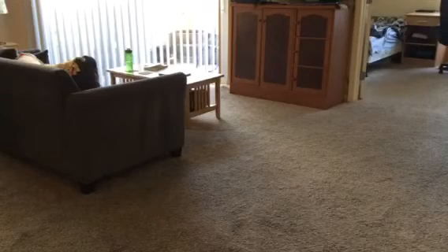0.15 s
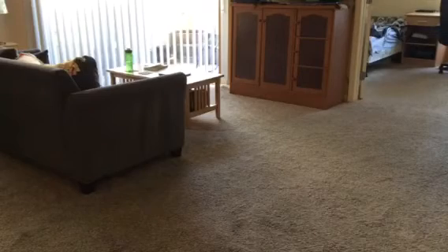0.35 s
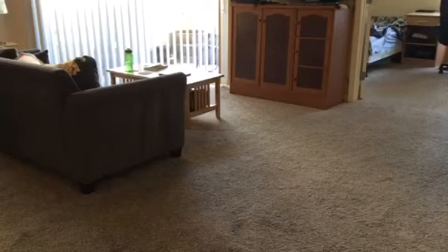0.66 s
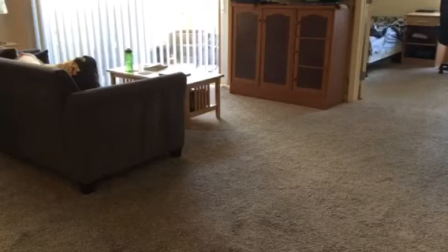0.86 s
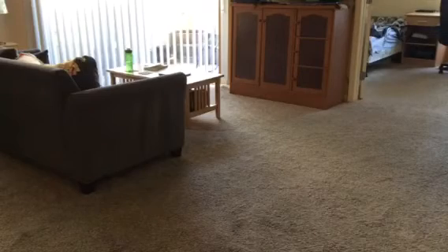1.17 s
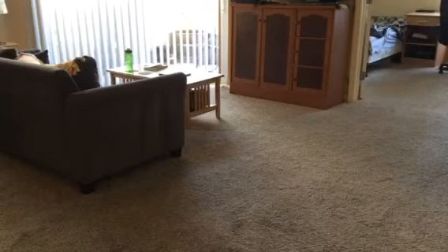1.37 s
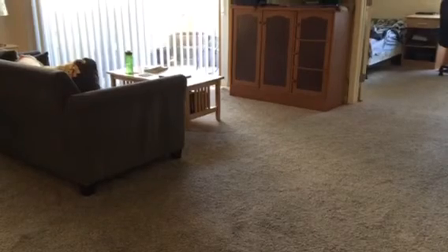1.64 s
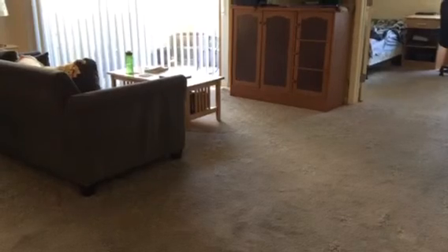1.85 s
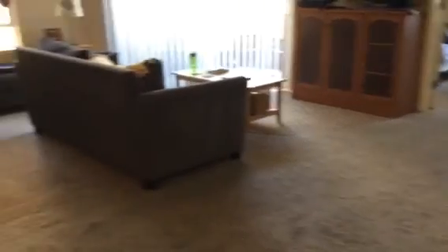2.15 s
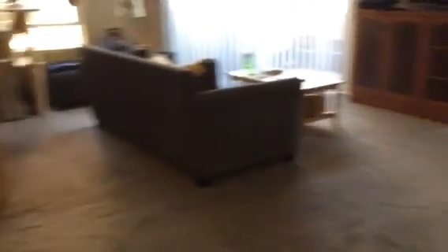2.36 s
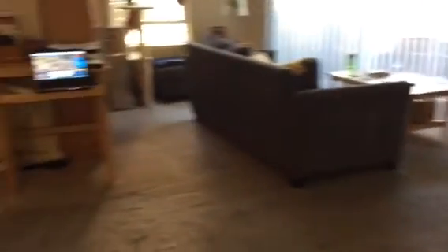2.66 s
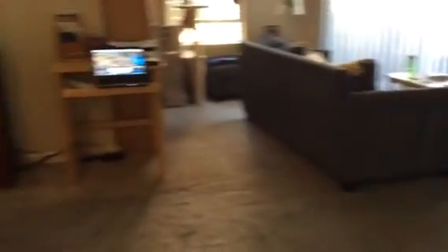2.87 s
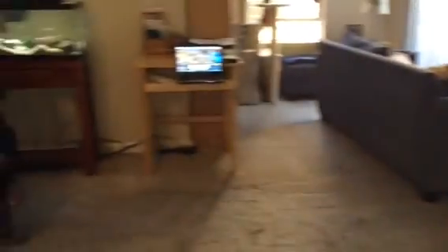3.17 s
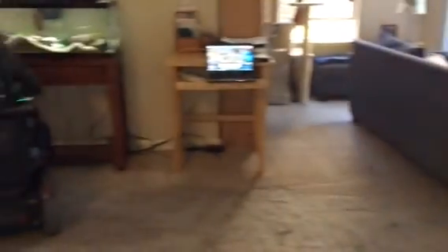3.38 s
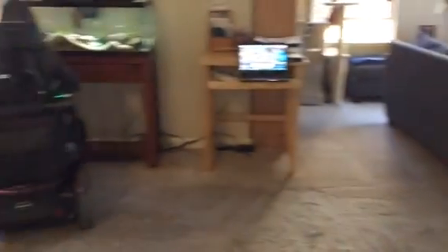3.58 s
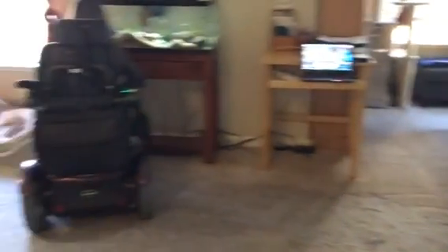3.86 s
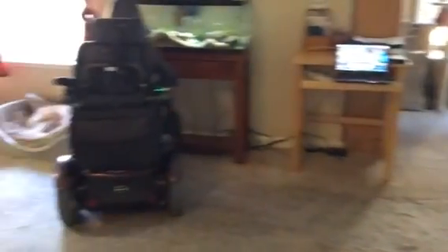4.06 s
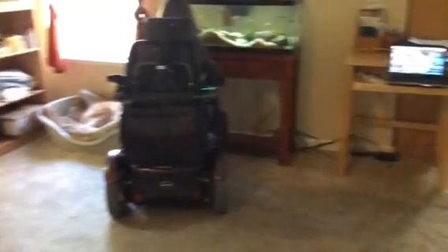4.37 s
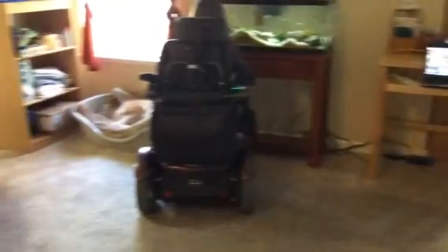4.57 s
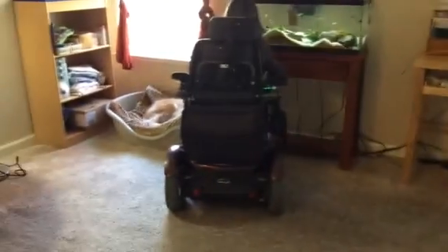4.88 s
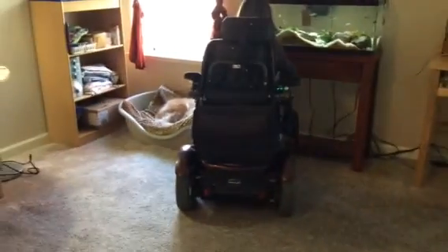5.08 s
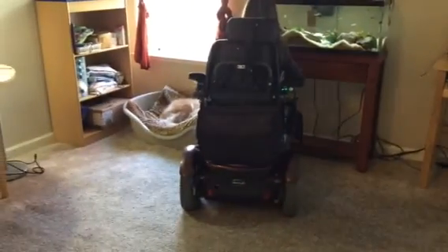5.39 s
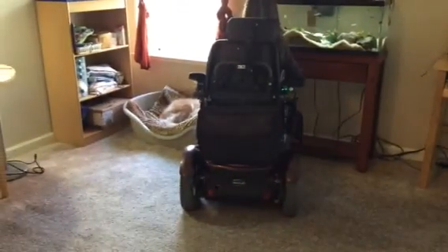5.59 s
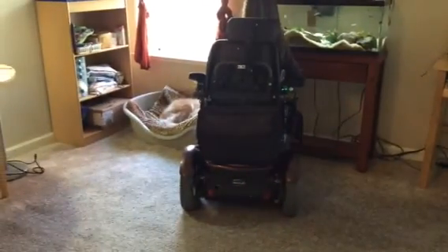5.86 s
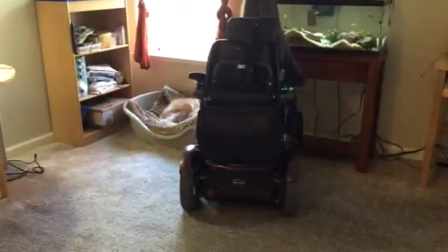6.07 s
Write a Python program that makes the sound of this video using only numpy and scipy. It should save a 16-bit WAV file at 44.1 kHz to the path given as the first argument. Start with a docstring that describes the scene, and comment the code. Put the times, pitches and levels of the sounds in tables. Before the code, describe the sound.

A quiet carpeted living room with a faint pump hum that grows louder. After about a second and a half, a power wheelchair a couple of metres from a phone snaps its brakes off in sharp clicks, jerks with a clunk and gear grind, then drives on with whirring motors, rattling frame and hissing tyres. It recedes, stops with a dull clack, and soft bumps follow over the aquarium.

```python
"""A carpeted living room, heard from a phone: an aquarium pump hums, louder once the phone swings round to it.
A power wheelchair a couple of metres away clicks its brakes off in short rings of their plates; a first nudge
takes up the load with a clunk of frame modes and grinding gear teeth, and the frame rattles through a turn.
Noise rung in the motor housings whirs, the tyres hiss on the pile, and the chair rolls away over the carpet.
The motors stop, a brake drops shut with a clack, and soft bumps follow over the pump, water and still air."""
import sys
import numpy as np
from scipy import signal
from scipy.fft import rfft, irfft, next_fast_len
from scipy.io import wavfile
from scipy.ndimage import uniform_filter1d, map_coordinates

SR = 44100
rng = np.random.default_rng(int(sys.argv[2]) if len(sys.argv) > 2 else 0)


def transcribe(u):
    """Save the signal u as a 16-bit wav file named by the first command-line argument.

    u: samples, shape (n,) or (channels, n), limited to [-1, 1]; the rate is SR.
    q: integer samples, one column per channel.
    """
    v = np.clip(np.atleast_2d(u).T, -1, 1)
    q = np.round(v * 32767).astype(np.int16)
    wavfile.write(sys.argv[1], SR, q)


N = 274743
TIME = np.arange(N) / SR


def undb(db):
    """Decibels to gain."""
    return 10 ** (np.asarray(db) / 20)


def unit(x):
    """Scale to rms 1."""
    return x / np.sqrt(np.mean(x ** 2))


def noise(length=N):
    """White noise."""
    return rng.standard_normal(length)


def colour(x, points):
    """Filter by a smooth (Hz, dB) spectrum; rms 1."""
    hz, db = np.transpose(points)
    size = next_fast_len(len(x))
    bins = np.maximum(np.fft.rfftfreq(size, 1 / SR), 1)
    gain = undb(np.interp(np.log(bins), np.log(hz), db))
    return unit(irfft(rfft(x, size) * gain, size)[:len(x)])


def resonate(x, hz, width):
    """One resonance, gain 1 at its centre."""
    return signal.lfilter(*signal.iirpeak(hz, hz / width, fs=SR), x)


def housing(x, modes):
    """Ring a set of (Hz, width Hz, dB) resonances with alternating signs; rms 1."""
    rung = 0
    for k, (hz, width, db) in enumerate(modes):
        rung = rung + (-1) ** k * undb(db) * resonate(x, hz, width)
    return unit(rung)


def walk(rate):
    """Random levels held 1 / rate s and slewed; spread near 1."""
    hold = int(SR / rate)
    steps = np.repeat(noise(N // hold + 1), hold)
    return unit(uniform_filter1d(steps, hold)[:N])


def grains(per_s, spread_db):
    """Dense tiny impacts of very unequal size; rms 1."""
    hit = rng.random(N) < per_s / SR
    size_db = spread_db * np.minimum(rng.exponential(size=N), 4)
    return unit(hit * noise() * undb(size_db))


def fade(t, t60):
    """Free decay of a struck thing, 60 dB in t60 seconds."""
    return np.exp(-np.log(1000) * t / t60)


def ramp(start, length):
    """Rise evenly from 0 to 1."""
    return np.clip((TIME - start) / length, 0, 1)


def add(out, s, sound):
    """Mix a short sound in at s seconds."""
    i = int(s * SR)
    out[i:i + len(sound)] += sound[:N - i]


# Resonances of the motor and gear housings. Each row: centre in Hz, width in Hz, relative level in dB.
HOUSING_MODES = [(826, 27, -2.5), (968, 67, -16), (1150, 87, -5.5), (1508, 84, 0.5), (1766, 93, -0.5),
                 (1997, 130, 0.5), (2177, 83, 2), (2600, 110, -5), (2890, 140, -6), (3504, 380, -8),
                 (4540, 380, -14), (5000, 170, -13), (6540, 180, -10.5)]
# Hiss of the tyres on the pile. Each row: frequency in Hz, relative density in dB per Hz.
TYRE_SPECTRUM = [(700, -35), (1500, -7), (2100, 0), (2400, -6), (2900, 3.5), (3700, -1.5), (4750, -2.5),
                 (5100, -1), (5500, -2.5), (6100, 2), (6500, 5), (6950, -3), (7500, -2), (8100, 0.5),
                 (8600, -4.5), (9500, -1), (10000, -8), (12500, -11.5), (15500, -17.5)]
# Low resonances of the chassis under load. Each row: centre in Hz, width in Hz, relative level in dB.
CHASSIS_MODES = [(243.7, 32, 3), (322, 33, 1), (380, 15, -1), (426, 30, 1.5), (520, 59, -3.5),
                 (683, 23, -5), (800, 56, -6), (1064, 140, -6)]
# Rumble of the wheels on the floor. Each row: frequency in Hz, relative density in dB per Hz.
FLOOR_SPECTRUM = [(20, -34.5), (40, -15), (58, 0), (70, 4), (88, 0), (103, -0.5), (140, -5.5), (165, -10.5),
                  (200, -17), (260, -16.5), (340, -30.5), (600, -55), (16000, -93.5)]


def drive(shaft_hz=59.8, brush_depth=0.13, flutter_db=1.77, overtone_db=-20, unbalance_db=-18):
    """Brushes and gear teeth scrape in the housings; tyres crush the carpet pile and shake the floor."""
    halt_s, halt_fade_s = 5.02, 0.06
    cruise_s, cruise_rise_s, cruise_db = 3.29, 0.28, -51
    hiss_flicker_db, pile_db = 0.8, 1.7
    whir, hiss, growl, rumble = drive_levels()
    moving = 1 - ramp(halt_s - halt_fade_s, halt_fade_s)
    # the uneven pile makes the motors' speed and load waver
    turn = 2 * np.pi * np.cumsum(shaft_hz * (1 + 0.003 * walk(12))) / SR
    load = undb(walk(14))
    # the friction swells twice in each turn of the armature
    scrape = (noise() + 0.71 * grains(700, 1.4)) * (1 + brush_depth * np.cos(2 * turn))
    gears = housing(scrape, HOUSING_MODES) * whir * undb(flutter_db * walk(25.25))
    crush = noise() + 0.68 * grains(2500, 1.7)
    pile = colour(crush, TYRE_SPECTRUM) * hiss * undb(hiss_flicker_db * walk(27))
    tooth_spectrum = [(100, -10.0), (220, 0.5), (380, 2.0), (1100, -0.5), (2500, -24.5), (16000, -53)]
    teeth = colour(grains(1200, 1.0), tooth_spectrum)
    chassis = housing(teeth, CHASSIS_MODES) * growl
    floor = colour(noise(), FLOOR_SPECTRUM) * rumble
    # the motors hum once they reach cruising speed
    tones = undb(unbalance_db) * np.sin(turn) + np.sin(2 * turn) + undb(overtone_db) * np.sin(4 * turn)
    hum = unit(tones) * load * undb(cruise_db) * ramp(cruise_s, cruise_rise_s)
    return moving * (gears + pile + (chassis + floor) * undb(pile_db * walk(9)) + hum)


# Pushes of the joystick: taking up the load, a nudge, the long run, and a turn on top of it.
# Each row: start in seconds, speed-up in seconds, let go in seconds, slow-down in seconds, then the
# full-speed levels of gear whir, tyre hiss, motor growl and wheel rumble in dB, before the chair leaves.
JOYSTICK_PUSHES = [(1.638, 0.023, 1.84, 0.11, -64, -84.5, -56, -51.5),
                   (1.87, 0.18, 2.088, 0.15, -58, -57.5, -55.5, -52),
                   (2.17, 0.29, 4.82, 0.2, -56.5, -60, -62, -53.5),
                   (2.8, 0.28, 3.2, 0.16, -56.5, -57, -57, -49.5)]


def drive_levels():
    """Gains of whir, hiss, growl and rumble: pushes ramp the speed up and down, distance thins the sound."""
    # the distance is relative: only its growth against the starting value counts
    start_distance, leaves_s, growth_per_s = 0.69, 3.89, 1.55
    # powers of speed and of distance, in the order whir, hiss, growl, rumble; the lows fill the room
    speed_powers = np.array([0.55, 1, 0.99, 0.77])[:, None]
    distance_powers = np.array([0.7, 1.26, 0.39, 0.63])[:, None]
    energy = 0
    for start, rise, let_go, fall, *db in JOYSTICK_PUSHES:
        speed = ramp(start, rise) * (1 - ramp(let_go, fall))
        energy = energy + (undb(db)[:, None] * speed ** speed_powers) ** 2
    distance = start_distance + growth_per_s * np.maximum(TIME - leaves_s, 0)
    return np.sqrt(energy) * (start_distance / distance) ** distance_powers


# The gears' song under load. Each row: centre in Hz, width of one filter pass in Hz, relative level in dB.
SONG_MODES = [(377, 22, 9), (467, 46, 2), (1017, 110, -7), (1510, 98, -2.5), (2190, 180, -5.5)]
# Broad grinding of the loaded teeth. Each row: frequency in Hz, relative density in dB per Hz.
GRIND_SPECTRUM = [(70, -5), (130, 9), (190, 4), (330, 6.5), (480, 4), (560, 5.5), (680, 0.5), (1080, -0.5),
                  (1280, -15), (1520, -2), (1850, -9), (2200, 2), (2500, -8), (3400, -7.5), (3900, -19),
                  (7000, -30), (16000, -48)]
# Swells of gear load as the chair gets under way. Each row: start in seconds, rise in seconds,
# end in seconds, fall in seconds, level in dB, brightness of the song in dB per octave,
# grinding relative to that level in dB.
GEAR_LOADS = [(1.875, 0.096, 2.057, 0.11, -43, 0, -0.5), (2.37, 0.076, 2.45, 0.039, -46, -10, -14)]


def strain():
    """Loaded gear teeth grind roughly and ring wavering resonances; a light load leaves mostly a low groan."""
    song_db, song_waver = -5, 0.015  # the waver is a share of the pitch
    judder_db, judder_per_s = 2.2, 90  # the teeth catch and slip
    teeth, out = grains(2500, 1), 0
    uneven = np.cumsum(1 + song_waver * walk(20))
    song = []
    for hz, width, db in SONG_MODES:
        once = resonate(teeth, hz, width)
        song.append(undb(db) * resonate(once, hz, width))
    song = np.array(song)
    octaves = np.log2(np.array(SONG_MODES)[:, 0] / SONG_MODES[0][0])
    judder = unit(undb(judder_db * walk(judder_per_s)))
    grind = colour(noise() + grains(900, 2), GRIND_SPECTRUM) * judder
    for start, rise, end, fall, db, tilt_db, grind_db in GEAR_LOADS:
        steady = undb(tilt_db * octaves) @ song
        # reading at an uneven pace bends the pitch
        sung = unit(map_coordinates(steady, [uneven], order=1, mode="mirror"))
        swell = undb(db) * ramp(start, rise) * (1 - ramp(end, fall))
        out = out + swell * (undb(song_db) * sung + undb(grind_db) * grind)
    return out


# Tyres and casters scuff sideways on the carpet. Each row: centre in seconds, half length in seconds,
# level in dB.
SCUFF_TIMES = [(1.988, 0.0071, -29.5), (2.471, 0.014, -54), (3.133, 0.014, -43), (3.178, 0.016, -50.5),
               (3.296, 0.029, -44.5), (3.39, 0.023, -50)]
# Sound of rubber on the pile. Each row: frequency in Hz, relative density in dB per Hz.
SCUFF_SPECTRUM = [(300, -6), (800, 2.5), (1300, -6.5), (1700, 5.5), (2300, 7.5), (3300, 5), (4200, 2),
                  (5200, -4), (6500, 1), (8000, -6), (9400, -9), (11000, -14.5), (15500, -26)]


def scuffs(grain_share=0.84):
    """Rubber drags across the pile in short gritty swells."""
    swell = 0
    for s, half_length, db in SCUFF_TIMES:
        swell = swell + undb(db) * np.exp(-0.5 * ((TIME - s) / half_length) ** 2)
    return swell * colour(noise() + grain_share * grains(2500, 2.6), SCUFF_SPECTRUM)


# Modes of the left brake, then of the right. Each row: frequency in Hz, relative level in dB.
LEFT_BRAKE_MODES = [(1620, -7.5), (2240, 0), (2900, -5), (3420, -1.5), (4170, -9.5), (5000, -11.5),
                    (6450, -7.5), (6850, -9.5), (7900, -13), (9360, -11.5), (10300, -17.5), (12200, -17.5),
                    (13300, -17)]
RIGHT_BRAKE_MODES = [(2120, 2.5), (2650, 5.5), (3000, -1), (3590, -4.5), (4090, -16.5), (4890, -9),
                     (5750, 1.5), (6350, -6), (7050, -1), (7800, -6.5), (8700, -5.5), (9450, -2.5),
                     (10400, -13), (12700, -17)]
# Brake and relay clicks. Each row: start in seconds, peak level in dB, brightness in dB per octave,
# lowest freely ringing frequency in Hz, ring t60 in seconds, share of the right brake from 0 to 1.
BRAKE_CLICKS = [(1.685, -38, -5, 1500, 0.01, 0), (1.695, -15, -1.5, 1600, 0.014, 0),
                (1.7095, -22, 2.5, 1810, 0.0071, 0.2), (1.731, -43, -1, 1500, 0.01, 0),
                (1.756, -46, -2, 1600, 0.011, 0), (1.7842, -8, 1, 2130, .009, 0.94),
                (1.804, -50, -4, 1500, 0.01, .3), (2.0742, -29.5, -2, 1500, 0.008, 0.37),
                (2.294, -26, -1.5, 1190, 0.012, 0.44), (2.4785, -33.5, -6, 3000, 0.011, 0.2),
                (6.086, -54.5, 0.5, 1800, 0.018, 0.1)]


def clicks(crack_db=-6, contact_s=0.00033, edge_db=28):
    """A brake plate snaps against its stop: a crack, a very short ring and a faint buzz."""
    crack_t60_s, buzz_db, buzz_t60_s = 0.006, -31, 0.03
    out, t = np.zeros(N), TIME[:SR // 8]
    contact = 1 - np.exp(-t / contact_s)
    buzz = undb(crack_db) * fade(t, crack_t60_s) + undb(buzz_db) * fade(t, buzz_t60_s)
    for s, peak_db, tilt_db, low_hz, t60, right in BRAKE_CLICKS:
        click, right = 0, np.clip(right, 0, 1)
        for modes, share in (LEFT_BRAKE_MODES, 1 - right), (RIGHT_BRAKE_MODES, right):
            hz, db = np.transpose(modes)
            # a harder, shorter blow favours the high modes and holds the low ones back
            tilt = tilt_db * np.log2(hz / hz.mean())
            blow = db + tilt - edge_db * np.maximum(np.log2(low_hz / hz), 0)
            phase = rng.uniform(0, 2 * np.pi, (len(hz), 1))
            tones = undb(blow) @ np.sin(2 * np.pi * hz[:, None] * t + phase)
            ring = unit(tones) * fade(t, t60)
            grit_spectrum = [(400, blow[0] - 14), *zip(hz, blow), (16000, blow[-1] - 6)]
            grit = colour(noise(len(t)), grit_spectrum)
            click = click + share * (ring + grit * buzz) * contact
        # a small plate radiates little bass
        bass_cut = signal.butter(2, 1.2 * low_hz, "high", fs=SR, output="sos")
        click = signal.sosfilt(bass_cut, click)
        add(out, s, undb(peak_db) * click / abs(click).max())
    return out


# The housing's shiver after the clack. Each row: frequency in Hz, relative density in dB per Hz.
SHIVER_SPECTRUM = [(200, -12), (500, -4), (1100, -3), (1700, -3.5), (2700, -1.5), (4000, -3.5), (5200, -9),
                   (6000, -6.5), (7800, -13), (9500, -16.5), (11000, -26), (15500, -29)]


def clack(shiver_db=-42, shiver_t60=0.035):
    """The brake drops shut: a dull blow of a few cycles, then the housing shivers."""
    start_s, blow_db, blow_hz, swell_s = 5.0972, -28.5, 1940, 0.00036
    out, t = np.zeros(N), TIME[:SR // 8]
    blow = np.sin(2 * np.pi * blow_hz * t) * t * np.exp(-t / swell_s)
    shiver = colour(noise(len(t)), SHIVER_SPECTRUM) * fade(t, shiver_t60) * (1 - np.exp(-t / swell_s))
    add(out, start_s, undb(blow_db) * blow / abs(blow).max() + undb(shiver_db) * shiver)
    return out


# Modes of the frame. Each row: mean frequency in Hz, relative level in dB, t60 in seconds.
FRAME_MODES = [(63.5, -14, 0.062), (109.5, 1, 0.095), (149, -0.5, 0.032), (257, -2, 0.031),
               (425, -5.5, 0.088), (579, -3, 0.028), (782, -9, 0.039), (1016, -8, 0.03), (1530, 2.5, 0.015),
               (2140, 5.5, 0.02), (2600, 3.5, 0.0087), (3280, -11.5, 0.0086), (5800, -3, 0.0066),
               (6510, -12, 0.0083)]
# Knocks of the frame and casters. Each row: start in seconds, strength in dB,
# weight of the modes below 1300 Hz in dB.
FRAME_KNOCKS = [(1.673, -39.5, 3.5), (1.679, -48, 0), (1.705, -37, -9), (1.832, -41.5, -3), (1.867, -47, 3),
                (1.904, -50, 0), (1.931, -44, -14), (1.981, -28.5, -20), (1.988, -27, -13.5),
                (2.106, -40, -6), (2.2, -42, -0.5), (2.479, -37, 0), (2.492, -32.5, -7.5),
                (2.521, -47, -24), (2.5934, -36, -6.5), (2.639, -40, -7), (2.6663, -45, -3.5),
                (2.7095, -39, -5.5), (2.738, -50, -4), (2.772, -38, -11), (2.788, -46, -3),
                (2.8111, -39, -11), (2.8375, -41, -12), (2.914, -44, -5), (3.123, -37, -11),
                (3.145, -35.5, -14), (3.178, -40, -9), (3.188, -38, -6), (3.212, -35.5, -16),
                (3.231, -40, -9), (3.262, -45, -8), (3.549, -41, -5), (3.561, -42.5, -8), (4.503, -51.5, 1),
                (4.7396, -47, -9)]


def knocks(rattle_db=-4):
    """Play in the frame is taken up: each blow rings its modes, and a heavy one favours the low ones."""
    thud_db, body_db, tick_db = 2, 3, -8.5  # modes below 220 Hz, below 1300 Hz, and above
    body_lag_s, rattle_t60_s = 0.00307, 0.018
    rattle_spectrum = [(300, 0), (1000, 4), (1300, -4), (1700, 1.5), (2600, 1.5),
                       (4200, -11.5), (7000, -16.0), (14000, -34.0)]
    out, t = np.zeros(N), TIME[:SR // 5]
    hz, db, t60 = np.transpose(FRAME_MODES)
    register = np.digitize(hz, [220, 1300])
    # the heavy parts of the frame answer a moment after the tick
    age = np.maximum(t - body_lag_s * (register < 2)[:, None], 0)
    for s, strength_db, weight_db in FRAME_KNOCKS:
        register_db = np.array([weight_db + thud_db, weight_db + body_db, tick_db])
        blow = db + strength_db + register_db[register]
        pitch = hz * (1 + 0.028 * noise(len(hz)))
        sign = rng.choice([-1, 1], len(hz))
        modes = np.sin(2 * np.pi * pitch[:, None] * age) * fade(age, t60[:, None])
        ring = (sign * undb(blow)) @ modes
        rattle = colour(noise(len(t)), rattle_spectrum) * fade(t, rattle_t60_s)
        add(out, s, ring + rattle * undb(strength_db + rattle_db))
    return out


# Soft bumps of the wheels and seat, and of the phone being handled (the first two rows).
# Each row: start in seconds, peak level in dB, pitch in Hz, ring t60 in seconds.
SOFT_BUMPS = [(.56, -58.5, 126, 0.24), (1.345, -65, 95, 0.18), (1.584, -41.5, 85, 0.11),
              (1.653, -37, 208, 0.044), (1.672, -38, 416, 0.027), (1.753, -47, 168, .06),
              (1.823, -35, 68.6, 0.053), (1.831, -41.5, 537, 0.016), (1.838, -43.5, 277, 0.075),
              (1.865, -36, 452, 0.026), (1.901, -40, 443, 0.032), (1.925, -40, 150, 0.067),
              (1.972, -28, 71, 0.043), (2.07, -42.5, 125, .12), (2.197, -34.5, 407, 0.063),
              (2.202, -43, 260, 0.093), (2.2, -58, 810, 0.04), (2.476, -34, 60.3, 0.1),
              (2.508, -43, 95.5, 0.053), (2.662, -40, 123, 0.063), (2.709, -41, 114, .07),
              (2.925, -32, 104, 0.16), (2.994, -34.5, 111, 0.094), (3.026, -40, 120, .06),
              (3.063, -38, 149, 0.053), (3.183, -41, 590, 0.031), (3.199, -30.5, 112, 0.055),
              (3.238, -40.5, 298, 0.042), (3.24, -37.5, 133, 0.05), (3.303, -41, 121, 0.051),
              (3.6, -42, 110.6, 0.2), (3.713, -41.5, 129, 0.079), (3.81, -43, 115, .1),
              (4.62, -46, 200, 0.049), (4.742, -46.5, 238, .06), (5.086, -48, 112, .08),
              (6.048, -47, 68.7, .11), (6.151, -45.5, 106, 0.07)]


def bumps(push_s=0.0049):
    """Cushioned blows swell for a few milliseconds and ring one note each, mostly low."""
    out, t = np.zeros(N), TIME[:SR // 3]
    for s, peak_db, hz, t60 in SOFT_BUMPS:
        bump = np.sin(2 * np.pi * hz * t) * fade(t, t60) * (1 - np.exp(-(t / push_s) ** 2))
        add(out, s, undb(peak_db) * bump / abs(bump).max())
    return out


# Aquarium pump on the mains, with the phone turned to it. Each row: frequency in Hz, level in dB rms.
PUMP_TONES = [(60, -68), (120, -58.5), (180, -83.5), (240, -67.5), (300, -76.5), (360, -81.5), (480, -79)]
# Rush of the water. Each row: frequency in Hz, relative density in dB per Hz.
WATER_SPECTRUM = [(20, -4.5), (45, -2.5), (70, -5.5), (95, 0), (160, 0.5), (215, -3), (270, -12),
                  (310, -0.5), (450, -4.5), (620, -10.5), (1000, -15.5), (1600, -21.5), (4000, -24),
                  (16000, -33.5)]
# Low rumble in the room. Each row: frequency in Hz, relative density in dB per Hz.
ROOM_RUMBLE_SPECTRUM = [(30, -27), (70, -8.5), (115, 0.5), (180, -0.5), (230, -16.5), (600, -44),
                        (16000, -88)]
# Still air of the room. Each row: frequency in Hz, relative density in dB per Hz.
AIR_SPECTRUM = [(30, 8), (300, 10), (1000, 3), (2500, -1), (5000, -2.5), (7300, -4), (9300, 0),
                (10500, -4.5), (13000, -8), (15500, -13)]


def aquarium(water_db=-63, far_waver_db=1.0, rumble_db=-74, rumble_waver_db=2.5):
    """Pump hum and moving water over the room's still air and low rumble; the hum wavers from afar."""
    # the phone swings round to the aquarium; before that its hum and water are fainter
    swing_from_s, swing_to_s, far_hum_db, far_water_db = 1, 1.8, -16, -6.5
    air_db = -75.8
    away = 1 - ramp(swing_from_s, swing_to_s - swing_from_s)
    pump = 0
    for hz, db in PUMP_TONES:
        tone = unit(np.sin(2 * np.pi * (hz * TIME + rng.random())))
        pump = pump + undb(db + far_waver_db * away * walk(10.0)) * tone
    water = colour(noise(), WATER_SPECTRUM) * undb(water_db + 0.21 * walk(6.6))
    rumble = colour(noise(), ROOM_RUMBLE_SPECTRUM) * undb(rumble_db + rumble_waver_db * walk(7.3))
    air = undb(air_db) * colour(noise(), AIR_SPECTRUM)
    return undb(far_hum_db * away) * pump + undb(far_water_db * away) * water + rumble + air


def scene():
    """The chair in a room deadened by carpet and sofa, with the aquarium behind it."""
    room_t60_s, room_db = 0.074, -20
    chair = drive() + strain() + scuffs() + clicks() + clack() + knocks() + bumps()
    t = TIME[:SR // 2]
    echo = colour(noise(len(t)), [(200, 3.5), (2500, -9.5), (12000, -15.0)])
    echo = echo * fade(t, room_t60_s) * (t > 0.004)  # the room answers after 4 ms
    room = signal.fftconvolve(chair, echo / np.linalg.norm(echo))[:N]
    return (chair + undb(room_db) * room + aquarium())[None]


def record(dry):
    """The phone thins the deepest bass and cuts the top of the treble."""
    bass_cut = signal.butter(3, 44, "high", fs=SR, output="sos")
    treble_cut = signal.ellip(10, 0.2, 70, 15350, fs=SR, output="sos")
    return signal.sosfilt(treble_cut, signal.sosfilt(bass_cut, dry))


dry = scene()
out = record(dry)
transcribe(out)
```